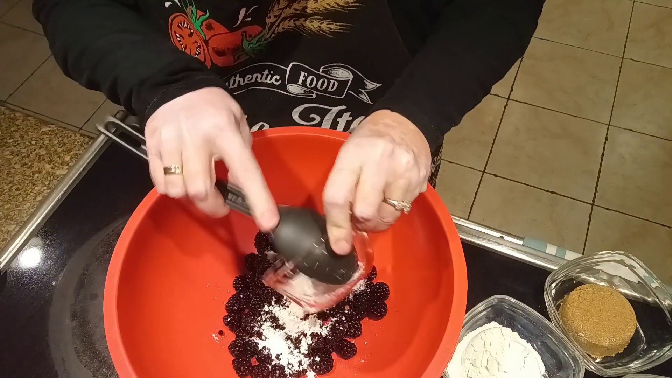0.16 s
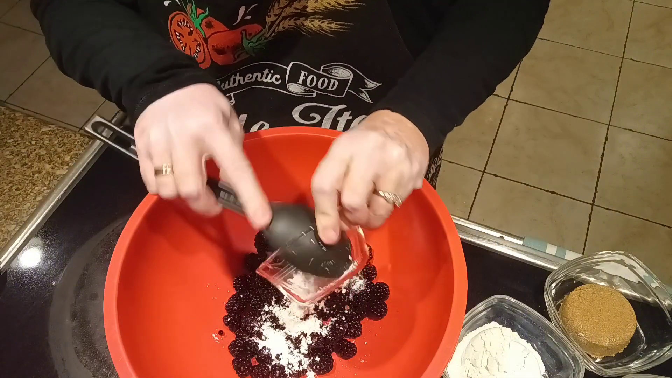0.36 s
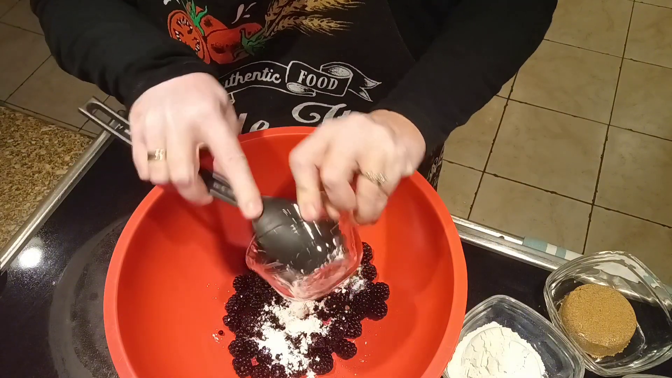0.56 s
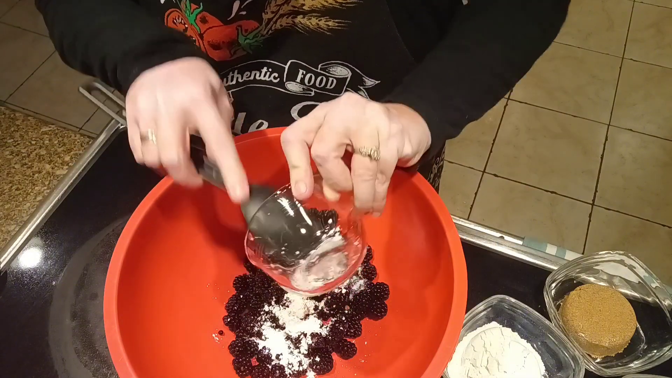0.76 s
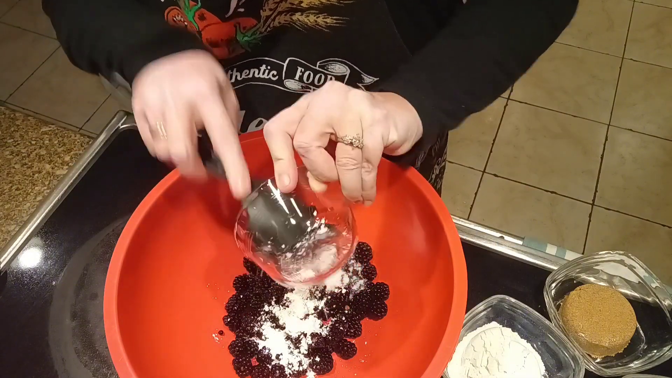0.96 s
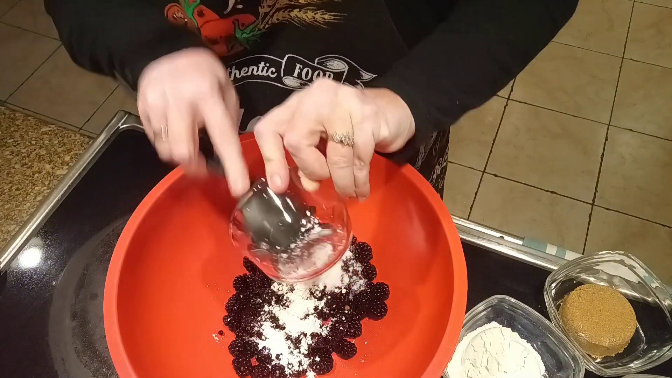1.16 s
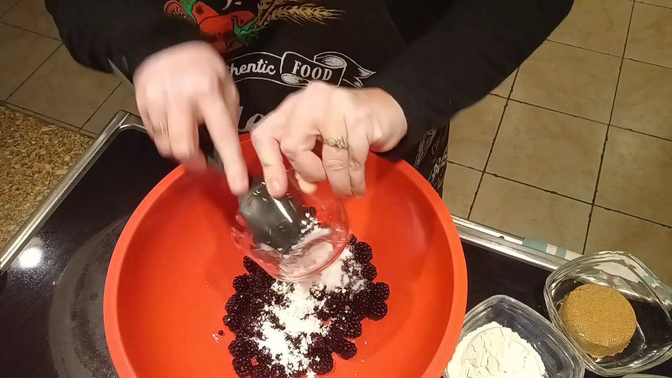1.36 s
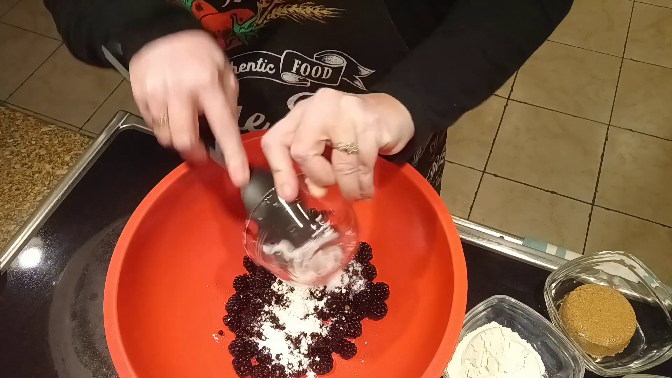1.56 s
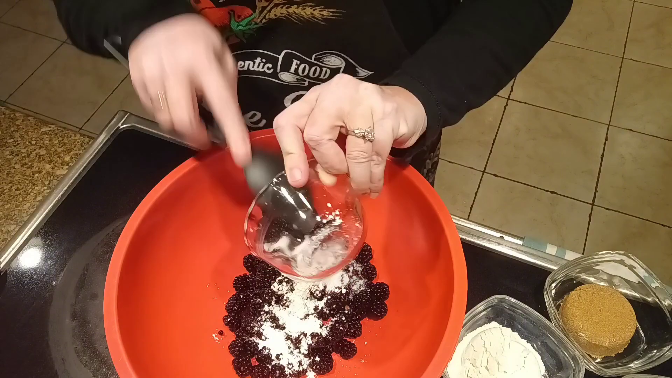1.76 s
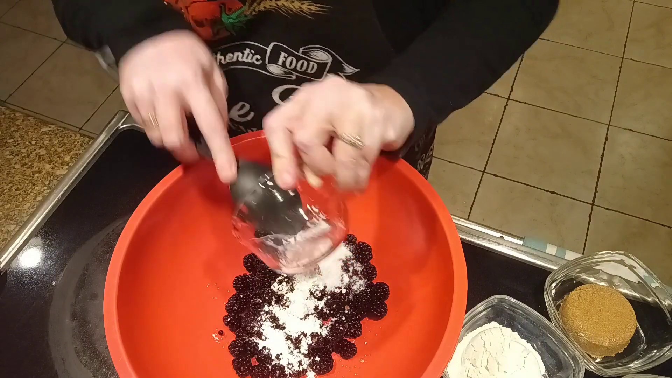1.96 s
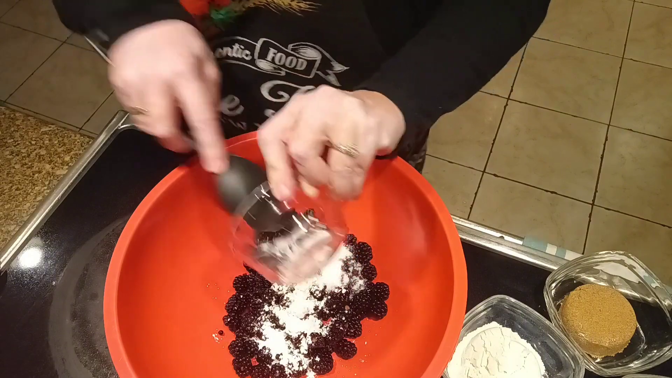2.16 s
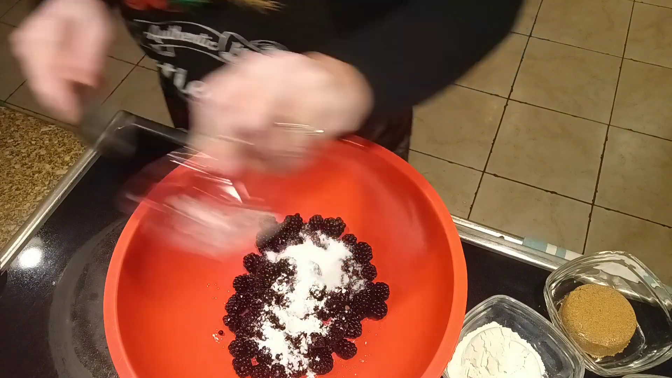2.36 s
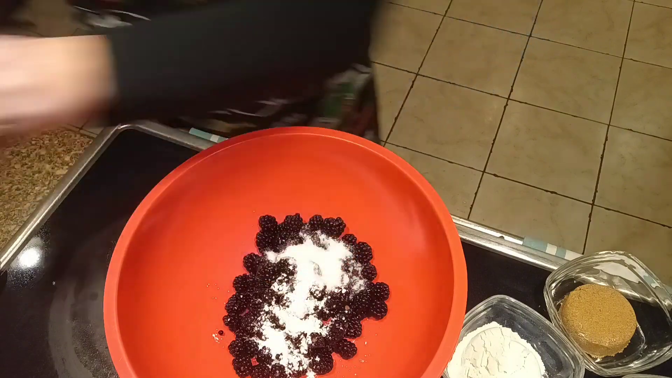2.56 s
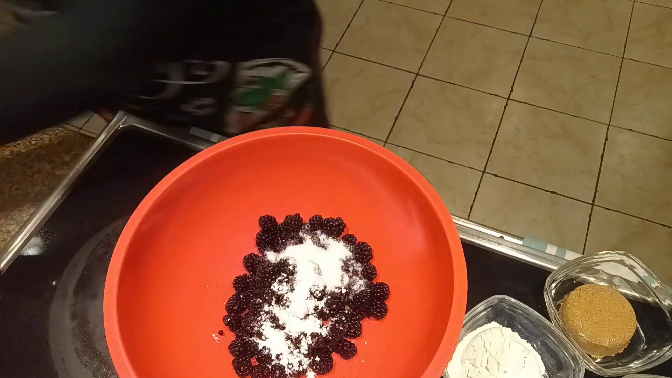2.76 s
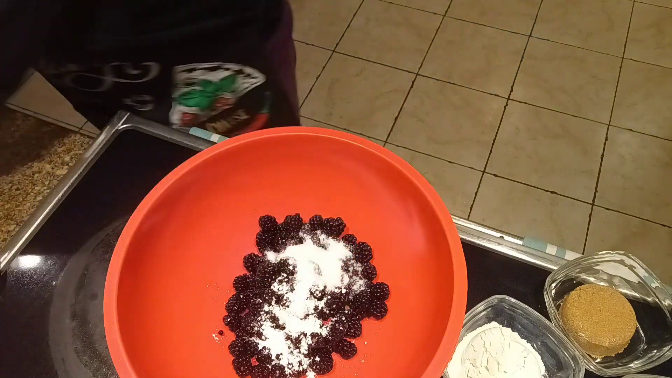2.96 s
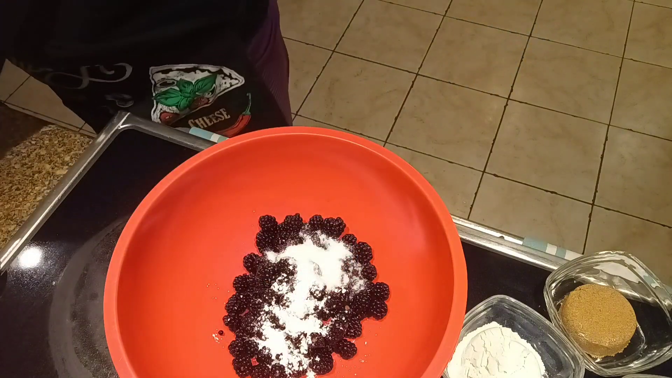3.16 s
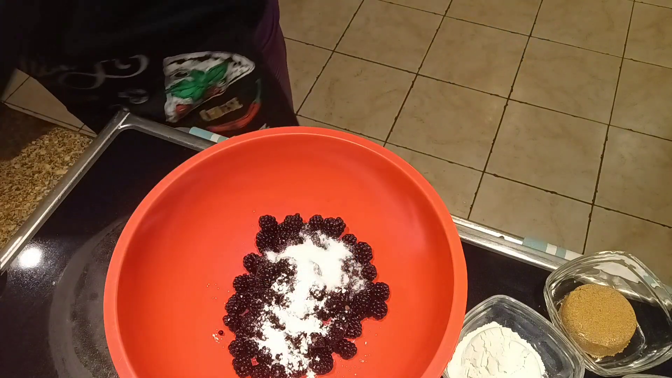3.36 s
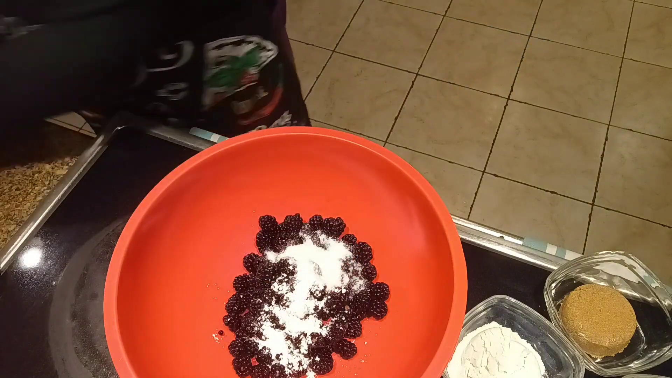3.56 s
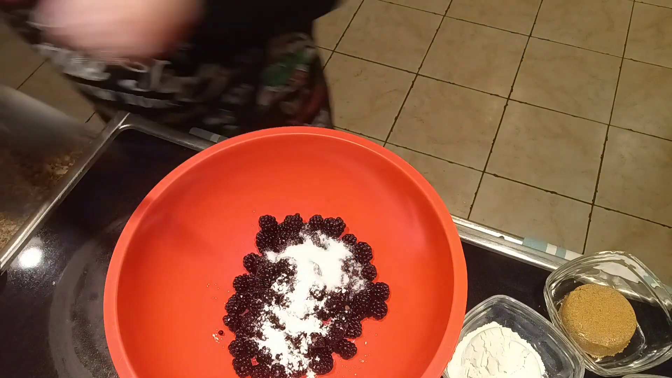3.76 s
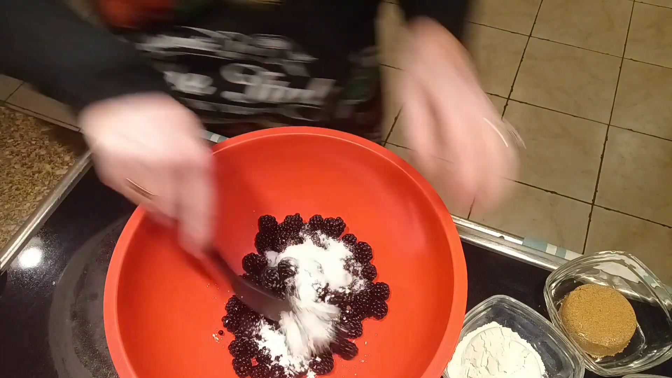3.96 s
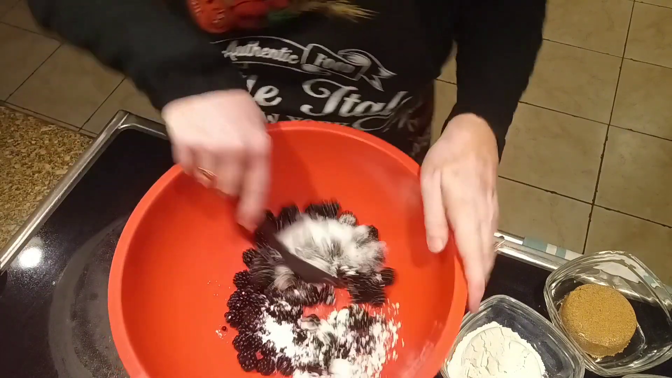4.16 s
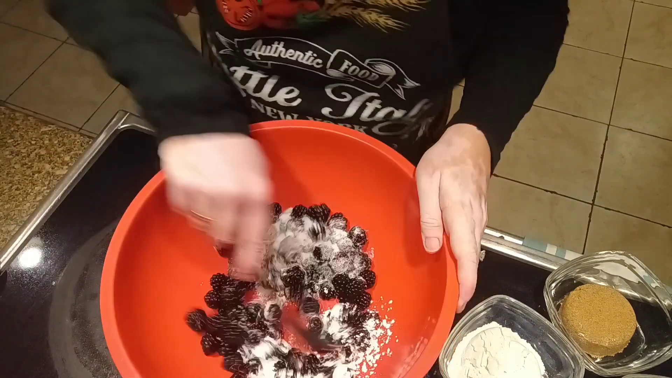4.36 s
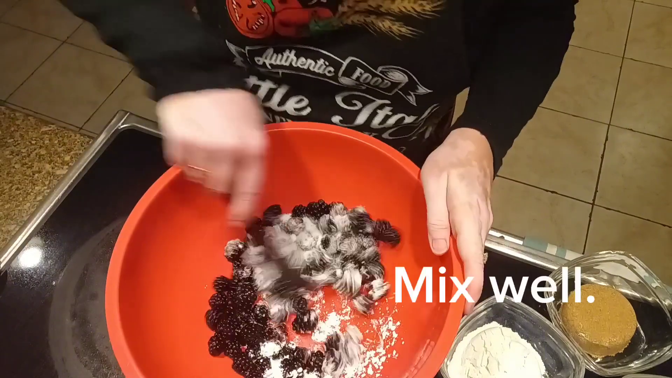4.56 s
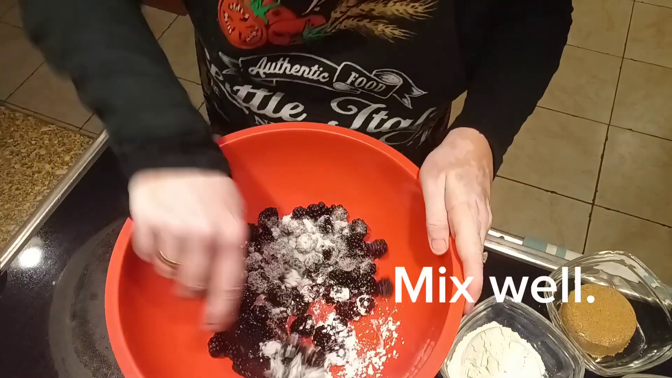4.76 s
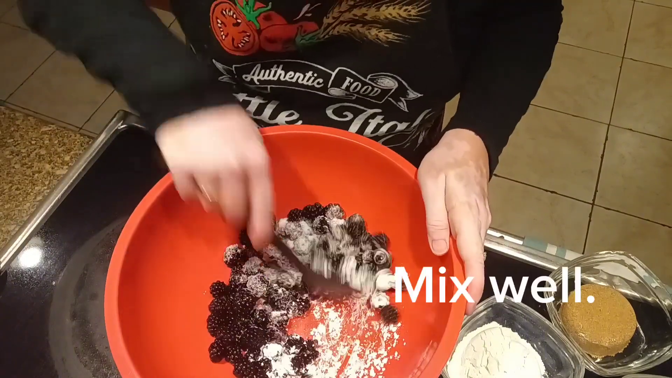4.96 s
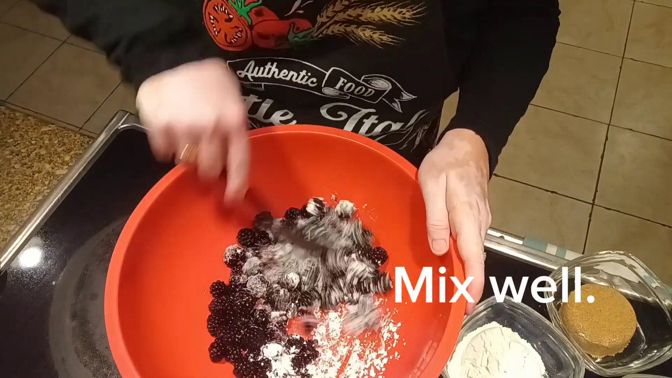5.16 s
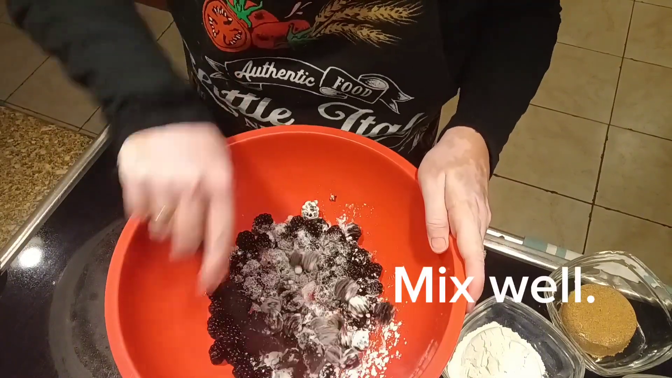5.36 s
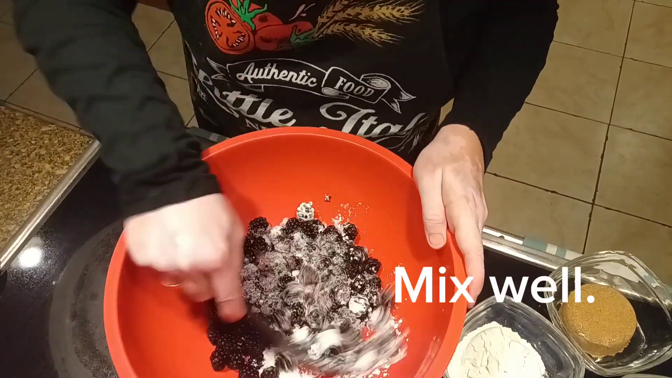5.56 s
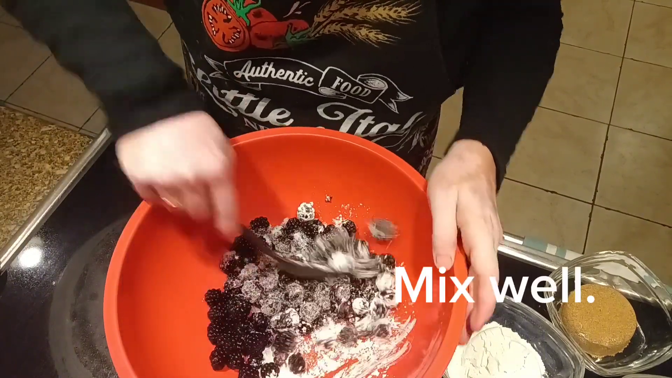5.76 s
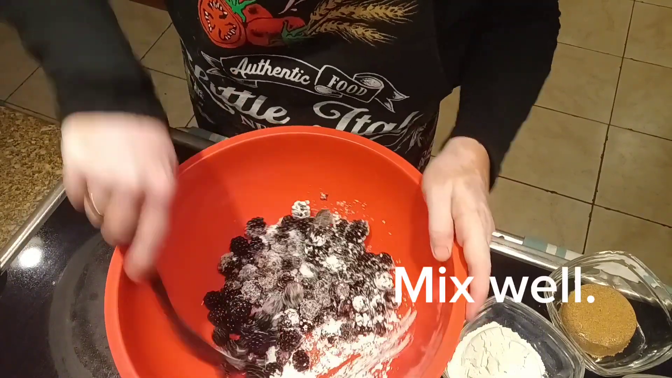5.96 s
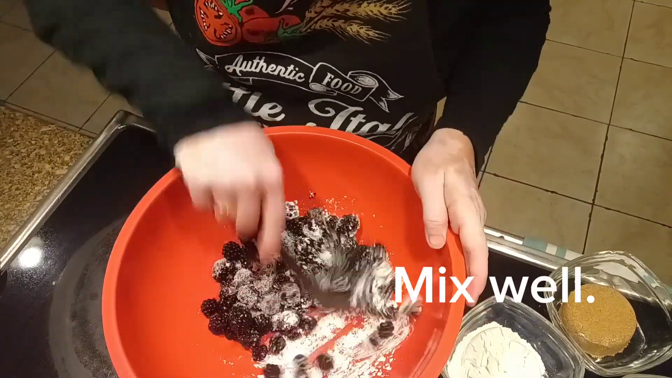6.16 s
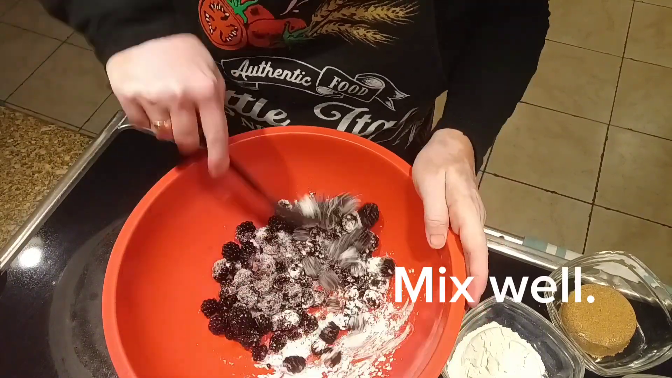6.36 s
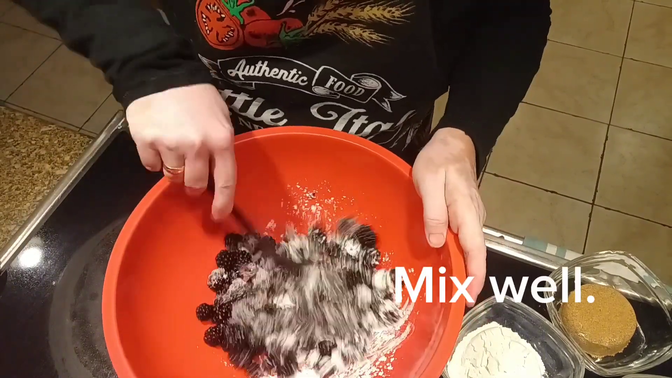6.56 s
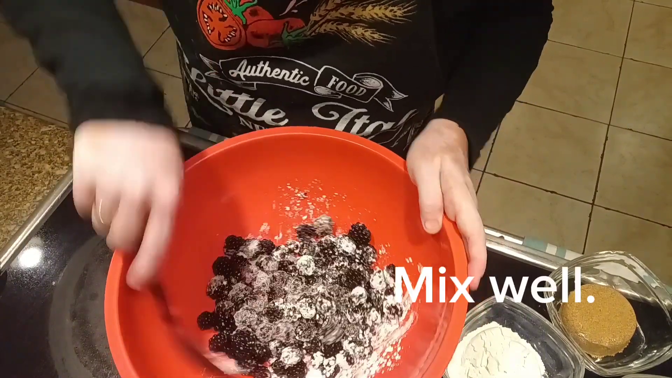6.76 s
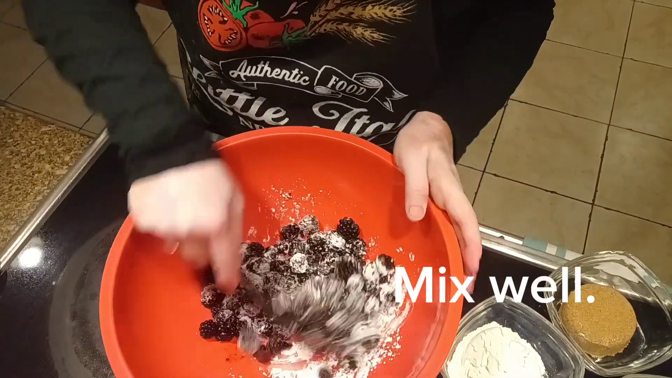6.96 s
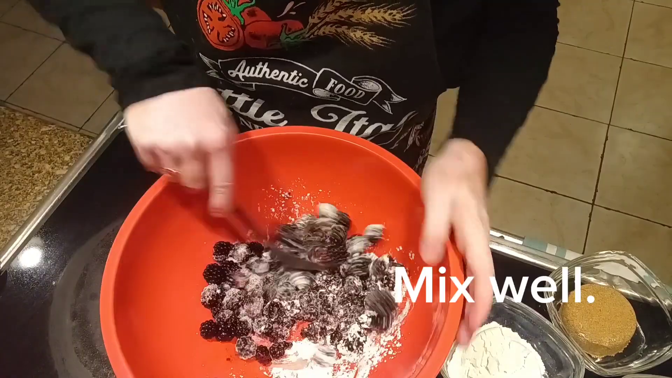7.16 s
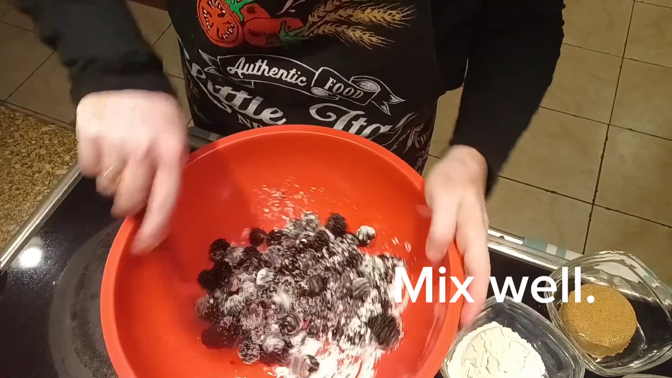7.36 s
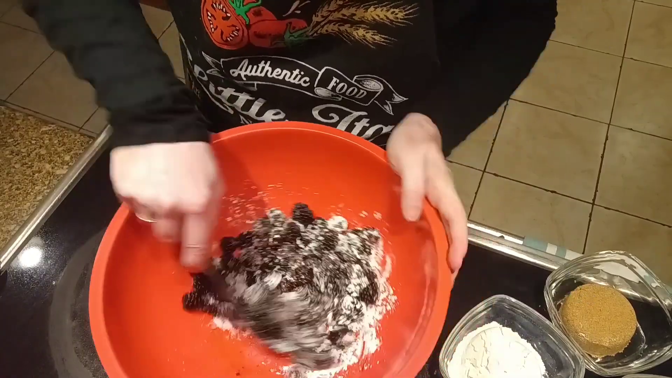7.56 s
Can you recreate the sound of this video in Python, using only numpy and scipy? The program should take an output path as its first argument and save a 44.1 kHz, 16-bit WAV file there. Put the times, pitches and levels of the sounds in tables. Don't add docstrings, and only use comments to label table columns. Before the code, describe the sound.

A close phone microphone picks up a tiled kitchen with soft air, a faint fridge hum and low body rumble. From 0 to 0.8 seconds, a spoon taps a small hand-held glass dish in quick uneven clusters, mixed with short gritty scrapes. Sparser bright taps continue to 1.6, then more at 2.0 and a looser, freer ring at 2.2. Things quieten, with faint ticks around 2.9 and 3.1. At 3.3 a metal tool clinks with a shimmering, beating ring; a hard low thud at 3.55 and a smaller one at 3.7 settle the dishes. From 4.05 stirring begins: a dense burst of plastic ticks, knocks and a strong rubbing swish near 4.4. Swishing strokes continue to 7.7, with dull, dry knocks at about 4.85, 5.5, 6.1, 6.55, 6.9 and 7.5. Each leaves a short hard-room tail, and loud hits briefly duck the background.

```python
import sys
import numpy as np
from scipy import signal
from scipy.fft import rfft, irfft, next_fast_len
from scipy.io import wavfile
from scipy.ndimage import uniform_filter1d, minimum_filter1d

SR = 44100
rng = np.random.default_rng(int(sys.argv[2]) if len(sys.argv) > 2 else 0)


def volts(x):
    e = np.asarray(x, float) / 20
    return 10 ** e


def file_out(sig):
    cols = np.atleast_2d(sig).T
    lim = np.clip(cols, -1, 1)
    pcm = np.round(lim * 32767).astype(np.int16)
    wavfile.write(sys.argv[1], SR, pcm)


N = 339129
T = np.arange(N) / SR
GRID_HZ = np.arange(100, 17000, 25)
KNEE_DB, SQUEEZE = -13, .6


def shaped(x, points):
    hz, db = np.transpose(points)
    size = next_fast_len(x.shape[-1])
    f = np.maximum(np.arange(size // 2 + 1) * SR / size, 1)
    gain = volts(np.interp(np.log(f), np.log(hz), db))
    return irfft(rfft(x, size) * gain, size)[..., :x.shape[-1]]


def band(x, lo_hz, hi_hz):
    return signal.sosfilt(signal.butter(3, [lo_hz, min(hi_hz, .45 * SR)], "band", fs=SR, output="sos"), x)


def unit(x):
    return x / np.sqrt(np.mean(x ** 2))


def walk(rate):
    k = int(SR / rate)
    steps = np.repeat(rng.standard_normal(N // k + 1), k)
    return 0.95 * uniform_filter1d(steps, k)[:N]


def pair(count):
    alike = 0.37
    both, own = rng.standard_normal(count), rng.standard_normal((2, count))
    return np.sqrt(alike) * both + np.sqrt(1 - alike) * own


def add(out, s, sound):
    i = int(s * SR)
    out[..., i:i + sound.shape[-1]] += sound[..., :N - i]


def swells(at_s, level_db, rise_s, fall_s, curve=1.48):
    out = np.zeros(N)
    for s, db, rise, fall in zip(at_s, level_db, rise_s, fall_s):
        t = np.arange(-int(2 * rise * SR), int(2 * fall * SR)) / SR
        t = t[s + t >= 0]
        distance = np.abs(t / np.where(t < 0, rise, fall))
        add(out, s + t[0], volts(db - 20 * distance ** curve))
    return out


def rumble():
    # time in seconds, level in dB.
    low_swell = [(0, -13), (1.2, -4.5), (2.2, -12), (2.7, -1), (3.3, 0), (3.9, -3.5), (4.3, 1.5), (4.9, 0),
                 (5.6, 2.5), (6.5, -4), (7.69, -4)]
    # time in seconds, hollow level in dB,
    # deep share in dB, length in seconds.
    bumps = [(2.71, -52, -6, .08), (3.187, -57, -1.5, .07), (3.502, -46, -4.5, .05),
             (3.559, -26.5, -25, 0.057), (3.731, -42.5, -8.5, 0.039), (4.172, -38, -8, 0.083),
             (4.316, -48, -2, 0.067), (4.412, -44, -24, 0.046), (4.51, -45, -4.5, 0.046),
             (5.57, -45.5, -1, 0.05), (5.69, -47, -9.5, 0.043), (5.917, -41.5, -12, .08),
             (6.07, -56, -6.5, 0.12), (6.35, -49, -18, 0.038), (6.551, -37, -19.5, 0.044),
             (6.817, -57.5, -1, 0.13), (7.002, -48, -12, 0.07), (7.333, -41, -10, 0.065)]
    # frequency in Hz, level in dB.
    hum = [(166.9, -62.5), (222, -62), (14150, -78.5)]
    low_swell_db = np.interp(T, *np.transpose(low_swell))
    s, db, deep_db, length = np.transpose(bumps)
    deep_env = volts(-57.5 + 1.5 * low_swell_db) + swells(s, db + deep_db, length, length)
    deep = unit(band(rng.standard_normal(N), 52, 75)) * deep_env
    hollow_env = volts(-55.5 + low_swell_db) + swells(s, db, length, length)
    hollow = unit(band(rng.standard_normal(N), 105, 188.5)) * hollow_env
    fridge = sum(np.sqrt(2) * volts(db + 2 * walk(1.9)) * np.sin(2 * np.pi * hz * T) for hz, db in hum)
    return deep + hollow + fridge


def room_air():
    # frequency in Hz, density in dB per Hz.
    colour = [(150, -28.5), (260, -6.5), (462, -9), (1250, -21), (4280, -22), (6870, -18), (11400, -35),
              (16500, -45.5)]
    # time in seconds, level in dB.
    swell = [(0, -6.5), (1.9, -9), (2.55, -4.5), (2.7, -1), (2.8, 0), (2.92, 0.5), (3.0, -3), (3.2, -1.5),
             (3.9, -3), (4.5, -1), (7.69, -5.5)]
    swell_db = np.interp(T, *np.transpose(swell)) + 3.5 * walk(7)
    return volts(-60 + swell_db) * unit(shaped(rng.standard_normal((2, N)), colour))


def before_gain(db):
    return db + max(db - KNEE_DB + 9.0, 0) * SQUEEZE / (1 - SQUEEZE)


def mode_rings(hz, db, t60, t, scatter_db, detune, wobble_db):
    chance = rng.standard_normal((4, len(hz), 1))
    gap = .5 * chance[3] * np.array([1, -1])[:, None, None]
    turns = hz[:, None] * (1 + detune * chance[0]) * t
    rings = np.sin(2 * np.pi * turns + 3 * chance[1] + gap)
    rings *= volts(db[:, None] + scatter_db * chance[2] - 60 * t / t60[:, None])
    knots = np.arange(0, len(t) + 260, 260)
    levels = rng.standard_normal((len(hz), len(knots)))
    waver = np.array([np.interp(np.arange(len(t)), knots, level) for level in levels])
    return rings * volts(wobble_db * waver)


def blows(events, hz, db, t60, rise_s, crack_s, crack_db, scatter_db, detune, held_s=0.36, top_db=0,
          wobble_db=0, broad_db=-8, wide_hz=150):
    edges_hz = [0, 1700, 3200, 5200, 22000]
    middles = np.log2([1.1, 2.4, 4.2, 7])
    contact_db = np.array([0.2, -0.2, -3.6, 0.4])
    out, t = np.zeros((2, N)), T[:int(held_s * SR)]
    fade = np.clip((held_s - t) / 0.0054, 0, 1)
    group = np.searchsorted(edges_hz, hz) - 1
    humps = sum(volts(d - db[group == k].max()) / (1 + ((GRID_HZ - f) / wide_hz) ** 2)
                for f, d, k in zip(hz, db, group))
    humps_db = 20 * np.log10(humps + volts(broad_db))
    low_cut = signal.butter(2, 280, "high", fs=SR, output="sos")
    for s, peak_db, bright, focus in events:
        share_db = contact_db - focus * np.abs(middles - bright)
        rings = mode_rings(hz, db, t60, t, scatter_db, detune, wobble_db)
        parts = [rings[:, group == k].sum(1) for k in range(4)]
        ring = sum(volts(d) * p / (np.abs(p).max() + 1e-9) for p, d in zip(parts, share_db))
        low, mid, high, top = share_db
        colour_hz = [250, 1100, 2400, 4200, 7000, 9000, 15000]
        colour_db = [low - 28.5, low, mid, high, top, top - 10.5 + top_db / 2, top - 33.5 + top_db]
        crack_colour = humps_db + np.interp(np.log(GRID_HZ), np.log(colour_hz), colour_db)
        crack = shaped(pair(len(t)), np.transpose([GRID_HZ, crack_colour])) * np.exp(-t / crack_s)
        sound = (0.68 * ring + volts(crack_db) * crack) * (1 - np.exp(-t / rise_s)) * fade
        sound = signal.sosfilt(low_cut, sound)
        add(out, s, volts(before_gain(peak_db - 4)) * sound / np.abs(sound).max())
    return out


def dish():
    # time in seconds, peak in dB, brightness in octaves above 1 kHz,
    # focus in dB per octave.
    taps = [(.007, -20, -4, 9), (.032, -21.5, -2.5, 5), (.12, -15, 3, 4.5), (.133, -11.5, 0.21, 16.5),
            (.161, -26, 0.7, 12), (.19, -22.5, 0, 7), (.306, -17, -0.06, 9), (.336, -29, -2.5, 11),
            (.35, -14, -9.5, 0.5), (.375, -5, 1.26, 13), (.545, -5.5, 1.17, 7.5), (.68, -13.5, 0.9, 1.5),
            (.762, -5, 1.35, 10.5), (1.0, -4, 1.35, 14), (1.156, -9, 5, 8), (1.194, -13.5, 0.2, 7),
            (1.219, -14, 1, 12.5), (1.369, -9, 2.9, 6.5), (1.417, -12.5, 0.92, 11.5),
            (1.563, -9.5, 2.9, 7.5), (1.606, -3, 1.0, 2), (2.03, -4, 2.07, 8), (2.103, -27, -2, 8),
            (2.41, -36, 1.7, 18), (2.455, -40, 1.26, 24)]
    let_go = [
        (2.206, -5, 1.63, 6.9),
    ]
    # frequency in Hz, width in Hz, level in dB.
    held_modes = [(970, 60, -10), (1270, 55, 0), (1890, 70, -9), (3100, 90, -7), (2320, 45, -1),
                  (2440, 50, 0), (2600, 45, 0), (3700, 90, -9), (4360, 70, -3), (5600, 90, -6),
                  (6400, 70, -2), (6950, 70, -3), (7450, 50, 0), (10900, 40, -18)]
    # frequency in Hz, level in dB, t60 in seconds.
    free_modes = [(1314, 0, 0.028), (1957, -7.5, 0.06), (2370, 0.5, 0.07), (2780, -6, 0.046),
                  (3060, -5.5, 0.043), (4290, -6.5, 0.04), (4360, -15, 0.3), (4450, -13, 0.06),
                  (6380, -4.5, 0.019), (7360, 3, 0.033), (10900, -32, 0.18)]
    hz, width, db = np.transpose(held_modes)
    held = blows(taps, hz, db, np.clip(1.2 / width, .012, .035), rise_s=0.00036, crack_s=0.005,
                 crack_db=1.0, scatter_db=4.5, detune=0.0099, held_s=.1, top_db=-4, wobble_db=1.5,
                 broad_db=-9.5, wide_hz=130.7)
    hz, db, t60 = np.transpose(free_modes)
    free = blows(let_go, hz, db, t60, rise_s=0.00062, crack_s=0.005, crack_db=7.0, scatter_db=0,
                 detune=0, wobble_db=5, broad_db=-3, wide_hz=140)
    return held + free


def stroke_layers(rows, sizzle_db, body_db, sizzle_per_weight):
    s, db, rise, fall, weight = np.transpose(rows)
    sizzle = sizzle_db + sizzle_per_weight * weight + 0.071 * (db + 32.5)
    shares = (0, 0.15 * weight, sizzle, body_db + weight)
    return np.array([swells(s, db + share, rise, fall, 1.88) for share in shares])


def rubbing():
    # time of top speed in seconds, level in dB, speeding up in seconds,
    # slowing down in seconds, weight on the wall in dB.
    scrapes = [
        (.014, -37.5, 0.018, .07, 1.5),
        (.185, -43.5, 0.034, 0.034, -6),
        (.345, -43, 0.015, .02, 0.5),
        (.41, -46.5, .02, .05, -5),
        (.5, -38.5, 0.08, .05, -3.5),
        (.74, -39, 0.017, .02, -6),
        (1.33, -52, .025, 0.023, -18.5),
    ]
    stirs = [(4.06, -48.5, 0.05, 0.12, 7.5), (4.17, -31, .04, 0.11, -3), (4.27, -28, .06, .06, -0.5),
             (4.37, -19, 0.088, 0.083, 5), (4.46, -31, 0.045, 0.065, 1.5), (4.6, -29.5, 0.074, 0.1, -1.5),
             (4.73, -43.5, 0.026, 0.11, -13), (4.9, -44.5, .04, .1, 10), (5.02, -34.5, 0.084, 0.055, -2.5),
             (5.16, -45, 0.058, 0.069, -9), (5.3, -28.5, 0.087, 0.13, -3), (5.62, -36, 0.1, 0.111, -3.5),
             (5.77, -50, 0.054, 0.052, -8), (5.9, -36.5, .1, 0.079, -6.5), (6.14, -37, 0.028, 0.027, -2.5),
             (6.2, -41.5, 0.027, 0.042, 15), (6.33, -33.5, 0.09, 0.039, -5), (6.43, -50, 0.03, 0.03, -19),
             (6.525, -31.5, 0.019, 0.072, -11), (6.65, -28, 0.132, 0.081, 1), (6.93, -25, 0.062, 0.11, -10),
             (7.33, -42, .14, 0.11, -0.5), (7.49, -41.5, 0.062, 0.15, 11.5), (7.6, -30.5, .04, 0.06, 0),
             (7.68, -33.5, .05, 0.056, 12)]
    # frequency in Hz, density in dB per Hz.
    rub_colour = [(300, -47.5), (954, -12), (2130, -7.5), (2650, -2.5), (4460, 2), (7020, 5.5),
                  (15400, -26), (16500, -33)]
    # frequency in Hz, width in Hz, level in dB.
    wall_rings = [(2740, 150, 4), (3250, 280, 5.5), (4500, 500, -1.5), (5650, 200, 0), (6360, 150, 4),
                  (7070, 170, 6.5), (8840, 200, 2), (10000, 240, 4)]
    sizes = volts(4.4 * np.minimum(rng.exponential(size=N), 4))
    slips = (rng.random(N) < 7000 / SR) * sizes * pair(N)
    bunched = (unit(slips) + 0.75 * pair(N)) * volts(1.8 * walk(140))
    grain = shaped(bunched, rub_colour)
    rings_db = sum(db / (1 + ((GRID_HZ - hz) / width) ** 2) for hz, width, db in wall_rings)
    grain = shaped(grain, np.transpose([GRID_HZ, rings_db]))
    envelopes = stroke_layers(scrapes, -11.5, -1, -0.81) + stroke_layers(stirs, -16.5, -16, 0.27)
    hiss_env, mid_env, sizzle_env, body_env = envelopes
    glass, wall = np.split(grain, [2 * SR], axis=1)
    glass_sizzle = unit(unit(band(glass, 9500, 12400)) + volts(-1) * unit(band(glass, 10750, 11000)))
    sizzle = np.hstack([glass_sizzle, unit(band(wall, 11760, 16230))])
    body = np.hstack([unit(band(glass, 1150, 1480)), unit(band(wall, 680, 2280))])
    layers = [(unit(band(grain, 2550, 3970)), volts(-6.0) * mid_env),
              (unit(band(grain, 3920, 6250)), volts(-2.0) * hiss_env),
              (unit(band(grain, 5860, 9530)), volts(-3.0) * hiss_env),
              (sizzle, sizzle_env),
              (body, body_env),
              (unit(band(grain, 540, 600)), volts(-19) * body_env * (T > 2))]
    return sum(x * env * volts(2.2 * walk(40) + 2.2 * walk(200)) for x, env in layers)


def kitchen(x):
    # centre in Hz, t60 in seconds, level in dB.
    tail_bands = [(297, 0.3, -11.5), (670, 0.32, -10), (1580, 0.32, -12), (3000, 0.39, -12.5),
                  (6240, 0.35, -10.5), (11000, 0.3, -20)]
    t = T[:int(.65 * SR)]
    tail = 0
    for hz, t60, db in tail_bands:
        noise = band(rng.standard_normal((2, len(t))), hz / 2.01, hz * 1.36)
        tail = tail + volts(db - 60 * t / t60) * noise * np.sqrt(2 * np.log(1000) / (t60 * SR))
    return signal.fftconvolve(x, tail * (1 - np.exp(-t / 0.0022)), axes=1)[:, :N]


def counter():
    # time in seconds, peak in dB, pitch in Hz.
    booms = [(0.762, -30, 520), (0.999, -26, 658), (1.219, -35, 800), (1.417, -34, 674),
             (2.027, -32.5, 842), (3.312, -26.5, 498), (4.194, -33, 670), (4.483, -39, 624),
             (4.844, -36.5, 510), (4.95, -37.5, 530), (5.535, -22, 540), (6.076, -32, 520),
             (6.548, -29.5, 594), (6.87, -31, 461), (7.513, -24, 420)]
    # time in seconds, peak in dB, push in seconds.
    thuds = [
        (3.44, -20.5, 0.035),
        (3.541, -14.5, 0.0011),
        (3.69, -26, 0.0081),
        (4.17, -42, 0.019),
        (5.539, -32, 0.0027),
        (5.901, -47.5, 0.029),
        (7.328, -48, 0.02),
    ]
    # frequency in Hz, level in dB, t60 in seconds.
    worktop = [(182.6, -7.5, 0.19), (353.5, -1.5, 0.11), (658, -27.5, 0.19)]
    out, t = np.zeros(N), T[:SR // 3]
    for s, peak_db, push_s in thuds:
        ring = sum(volts(db + 2.4 * rng.standard_normal() - 60 * t / t60) * np.sin(2 * np.pi * hz * t)
                   for hz, db, t60 in worktop)
        noise = unit(band(rng.standard_normal(len(t)), 120, 686)) * np.exp(-t / 0.034)
        ring = ring + volts(-11.0) * noise
        add(out, s, volts(peak_db) * ring * (1 - np.exp(-t / push_s)))
    for s, peak_db, hz in booms:
        boom = band(rng.standard_normal(len(t)) * np.exp(-t / 0.015), .8 * hz, 1.25 * hz)
        add(out, s, volts(peak_db + 3.5) * boom / np.abs(boom).max())
    return out


def bowl():
    # frequency in Hz, width in Hz, level in dB.
    wall_modes = [(553, 75, -19), (1016, 390, -20.5), (2140, 120, -14), (2690, 83, 6.5), (3244, 57, 14),
                  (3618, 420, 14), (4250, 130, -6), (5810, 480, 11.5), (6725, 140, 8.5), (7646, 300, 6),
                  (9900, 250, -5), (10500, 250, -6.5), (12700, 140, -18), (13800, 39, -15.5)]
    # time in seconds, peak in dB, brightness in octaves above 1 kHz,
    # focus in dB per octave.
    far_ticks = [
        (2.905, -41.5, 3.3, 8.5),
        (3.068, -27, 2.82, 32),
    ]
    wall_knocks = [(4.151, -16.5, 8.5, 23), (4.193, -12.5, -3, 2.1), (4.265, -14, 4.5, 6.2),
                   (4.303, -10, 2.9, 10), (4.356, -10, 6, 15), (4.485, -10, 4, 5.9), (4.709, -18, 2.2, 9),
                   (4.846, -9, 2.5, 13), (5.538, -7, 1.73, 9.4), (6.077, -6.5, 3, 7.2),
                   (6.551, -6.5, 2.3, 8), (6.869, -3.5, 2.5, 11), (7.514, -5, 3.5, 8.4),
                   (7.572, -6.5, 2.5, 10.3)]
    edge_ticks = [(4.046, -18.5, 2.37, 54), (4.229, -10, 3.9, 6.1), (4.321, -13, 2.9, 7.5),
                  (4.336, -13.5, 3, 8.9), (4.392, -13, 3, 8), (4.575, -22.5, 3.1, 8),
                  (4.993, -23, 2.3, 7.2), (5.255, -26, 2.6, 9.8), (5.328, -19, 2.6, 8),
                  (7.672, -22, 1.1, 12), (4.559, -15, 3.6, 7.9), (4.634, -16.5, 3.1, 10),
                  (4.775, -29, 2.7, 11), (5.213, -21.5, 1.93, 20), (6.111, -8.5, 2.24, 11),
                  (6.512, -19.5, 2, 29), (7.405, -37, 1.9, 6.1), (7.43, -34.5, 2.5, 7.4),
                  (7.534, -9.5, 2.4, 8.7)]
    hz, width, db = np.transpose(wall_modes)
    far = blows(far_ticks, hz, db, .04 + 0 * hz, rise_s=.002, crack_s=0.015, crack_db=13, scatter_db=5,
                detune=0, held_s=.1, top_db=-33)
    knocks = blows(wall_knocks, hz, db, np.clip(1.3 / width, .012, .03), rise_s=0.00089, crack_s=0.0069,
                   crack_db=-5.0, scatter_db=5, detune=.03, held_s=0.051, top_db=2.5, wobble_db=2.5,
                   broad_db=-2, wide_hz=248)
    ticks = blows(edge_ticks, hz, db, 0.012 + 0 * hz, rise_s=0.0002, crack_s=0.004, crack_db=5.5,
                  scatter_db=2.5, detune=0.013, held_s=0.028, broad_db=-1.5, wide_hz=300)
    return far + knocks + ticks


def metal():
    # time in seconds, peak in dB, brightness in octaves above 1 kHz,
    # focus in dB per octave.
    landing = [
        (3.311, -7, 2.8, 8.2),
    ]
    set_down = [
        (3.536, -11.5, 1.54, 5.1),
        (3.687, -21, 0.72, 11),
    ]
    # frequency in Hz, level in dB, t60 in seconds.
    tool_modes = [(1521, -20, .35), (1960, -25, .15), (2412, -23, .15), (3612, -12.5, .45), (3650, -22, .2),
                  (4410, -20, .3), (4730, -22, .3), (6268, -14, .15), (6292, -7, .35), (7472, -16, .25),
                  (7500, -10, .35), (7546, -13, .2), (9480, -20, .2), (11180, -26, .2)]
    stack_modes = [(662, -10, 0.07), (1505, -2, 0.05), (1910, -9, 0.26), (2050, -4, 0.097),
                   (2365, -9, 0.047), (3670, -15, 0.067), (4400, -10.5, 0.03), (5960, -18, 0.02),
                   (7200, -16, 0.089), (7540, -16, 0.099)]
    hz, db, t60 = np.transpose(tool_modes)
    clink = blows(landing, hz, db, t60, rise_s=.0015, crack_s=.024, crack_db=1, scatter_db=0, detune=0,
                  held_s=.215, top_db=-14, wobble_db=3.5, broad_db=-6, wide_hz=120)
    hz, db, t60 = np.transpose(stack_modes)
    settle = blows(set_down, hz, db, t60, rise_s=0.001, crack_s=0.015, crack_db=2.5, scatter_db=-1.0,
                   detune=0, top_db=-17.0, wobble_db=5.5, broad_db=-1.5, wide_hz=150)
    return (clink + settle) * volts(1.5 * walk(110))


def scene():
    near = dish() + rubbing() + counter() + bowl() + metal()
    return near + kitchen(near) + rumble() + room_air()


def band_limit(x):
    return signal.sosfilt(signal.butter(12, 16850, fs=SR, output="sos"), x)


def record(dry):
    # frequency in Hz, left minus right in dB.
    ports = [(60, 5), (250, 7.5), (1000, 7.5), (3000, 6.5), (5500, 12), (7800, 13.5), (9000, -13),
             (12000, -6)]
    # frequency in Hz, level in dB.
    mic = [(30, -9.5), (60, -5), (6000, -6.5), (7800, -6.5), (8600, -6), (12000, -4), (17000, -9)]
    look_ahead_s, release_db_s = .024, 120.5
    left = shaped(np.roll(dry[0], 42), [(hz, db / 2) for hz, db in ports])
    right = shaped(dry[1], [(hz, -db / 2) for hz, db in ports])
    x = shaped(np.array([left, right]), mic)
    level_db = 20 * np.log10(np.abs(x).max(0) + 1e-9)
    over_db = SQUEEZE * np.maximum(level_db - KNEE_DB, 0)

    def coming(size):
        return -minimum_filter1d(-over_db, size, origin=-(size // 2))

    ahead = int(look_ahead_s * SR)
    needed_db = np.maximum(.65 * coming(ahead), coming(ahead // 4))
    cut_db = np.maximum.accumulate(needed_db + release_db_s * T) - release_db_s * T
    x = x * volts(-uniform_filter1d(cut_db, size=260))
    limited = .98 * np.tanh(2.1 * x)
    low_pass = signal.ellip(8, .2, 70, 16900, fs=SR, output="sos")
    return band_limit(signal.sosfilt(low_pass, limited))


dry = scene()
out = record(dry)
file_out(out)
```